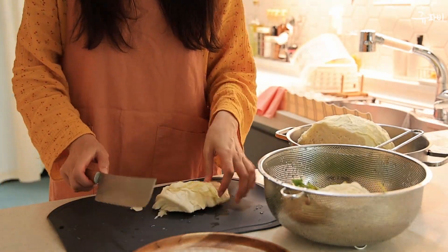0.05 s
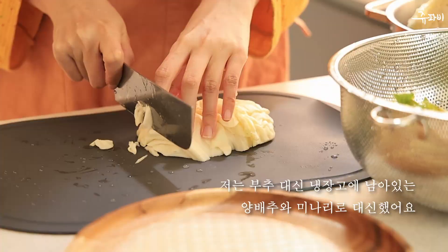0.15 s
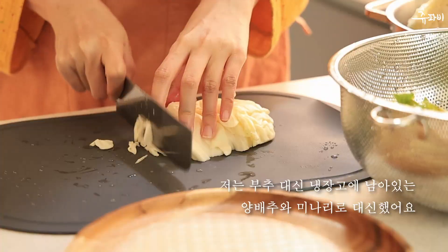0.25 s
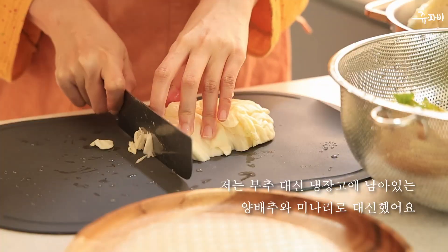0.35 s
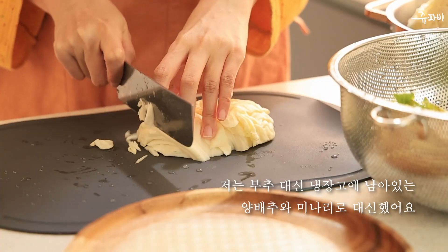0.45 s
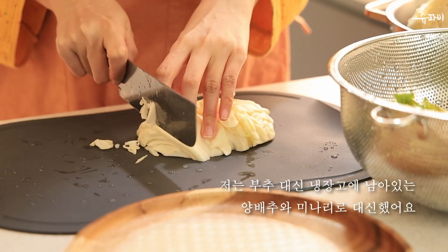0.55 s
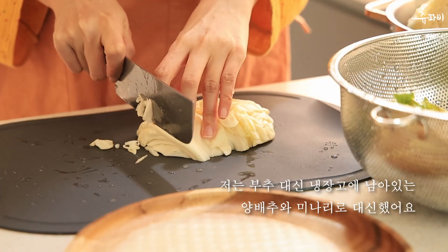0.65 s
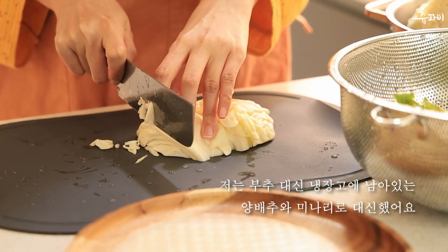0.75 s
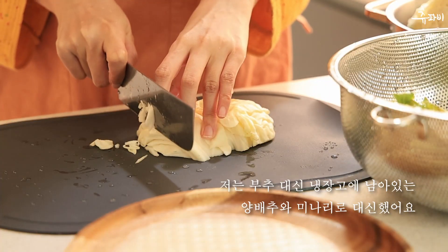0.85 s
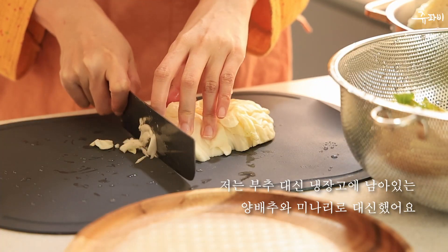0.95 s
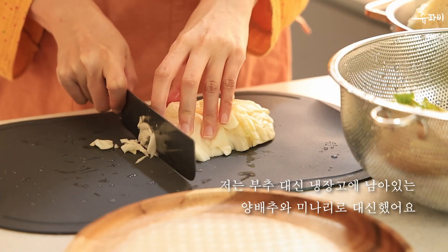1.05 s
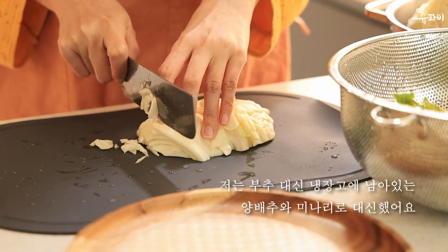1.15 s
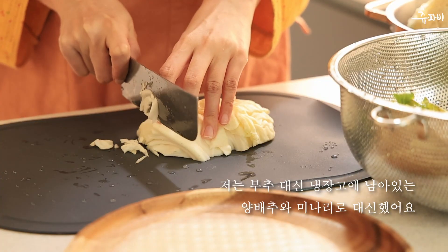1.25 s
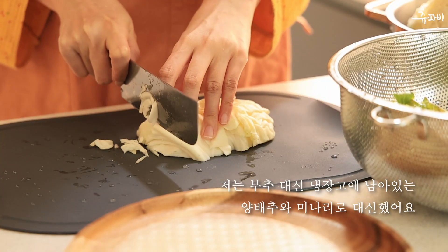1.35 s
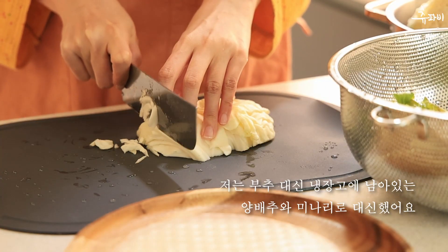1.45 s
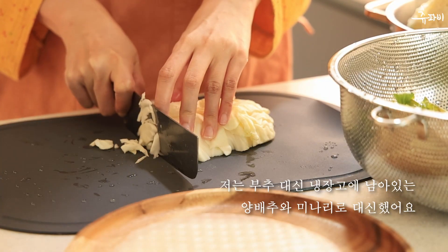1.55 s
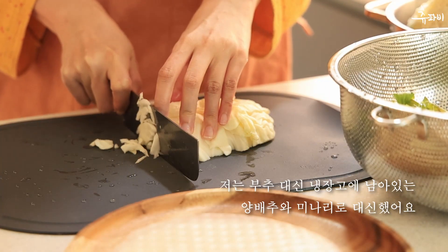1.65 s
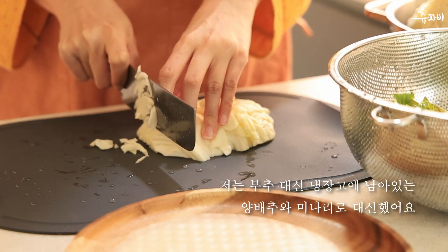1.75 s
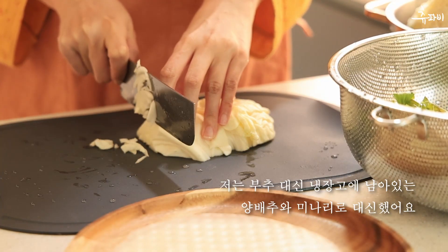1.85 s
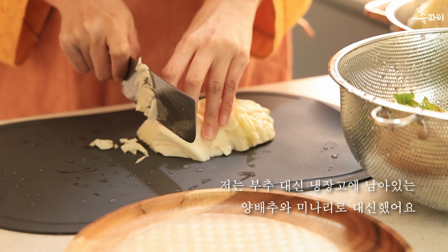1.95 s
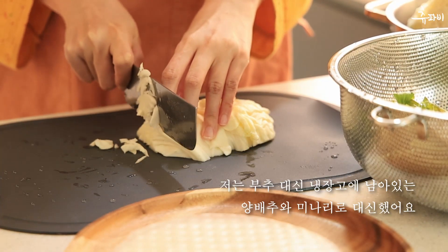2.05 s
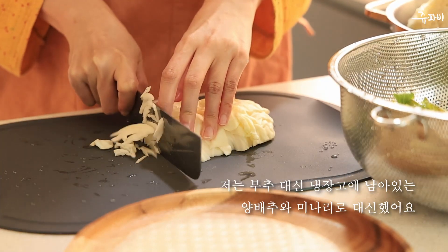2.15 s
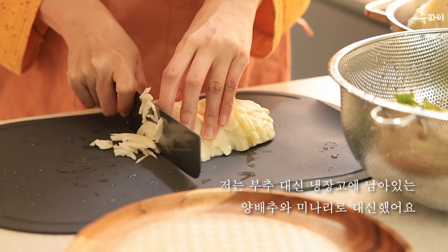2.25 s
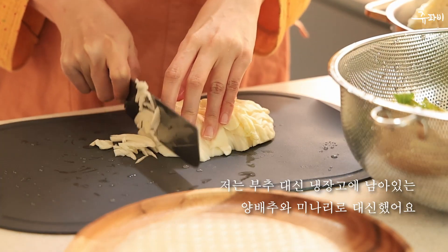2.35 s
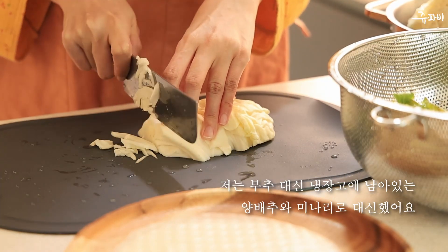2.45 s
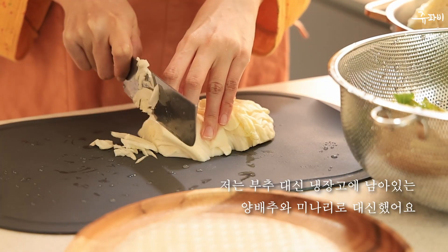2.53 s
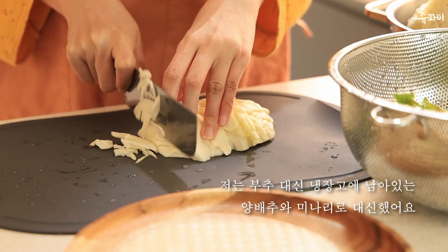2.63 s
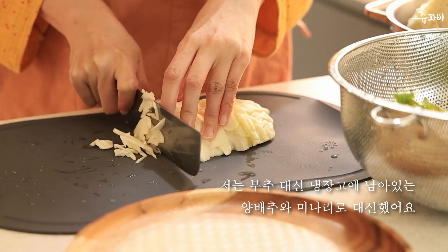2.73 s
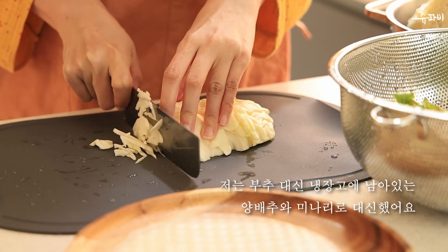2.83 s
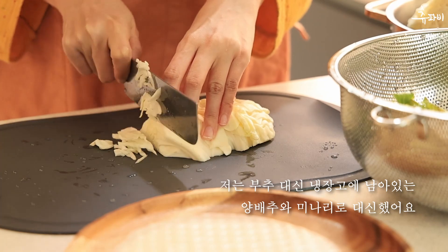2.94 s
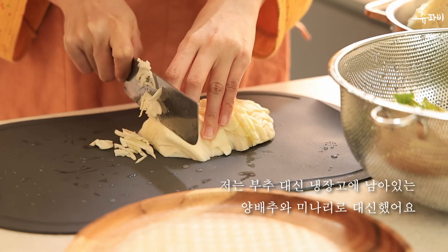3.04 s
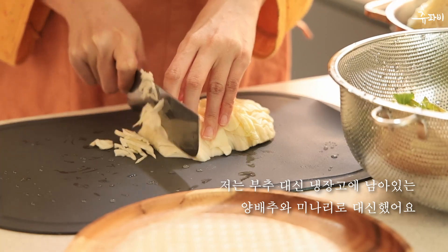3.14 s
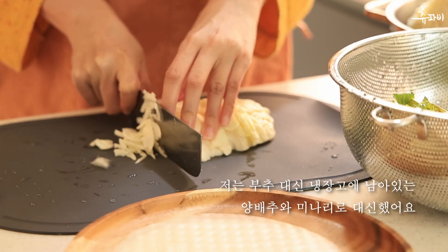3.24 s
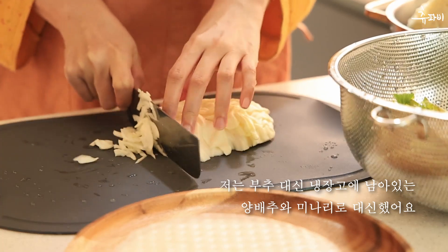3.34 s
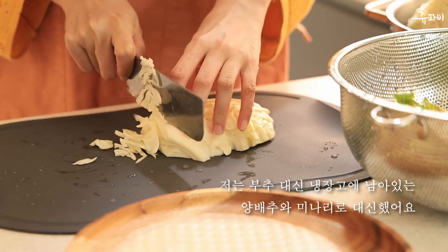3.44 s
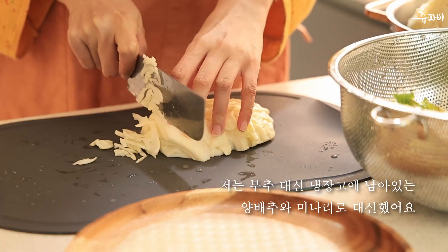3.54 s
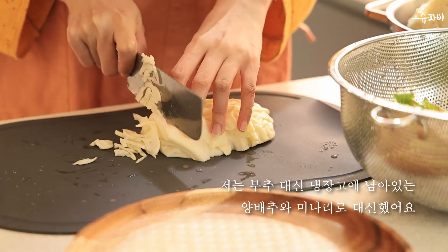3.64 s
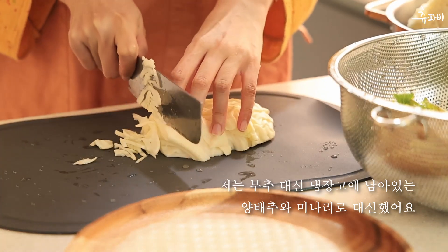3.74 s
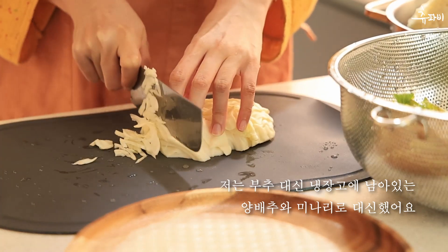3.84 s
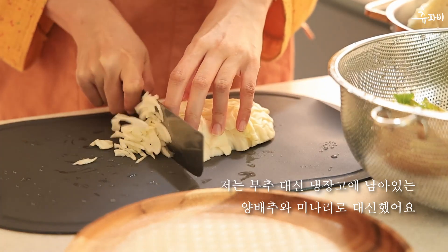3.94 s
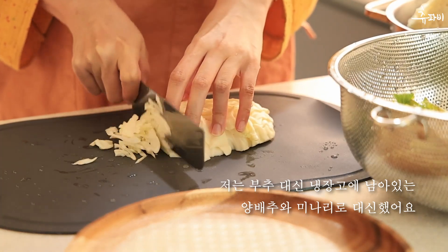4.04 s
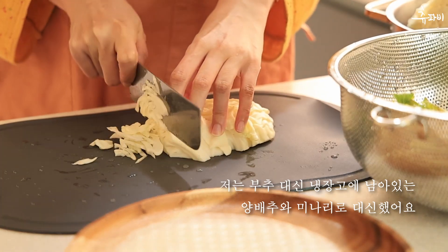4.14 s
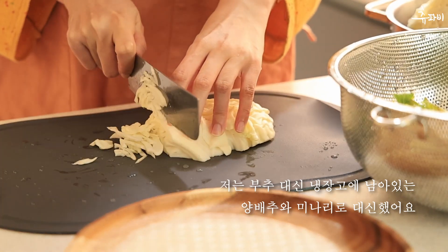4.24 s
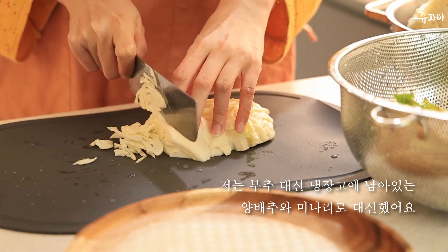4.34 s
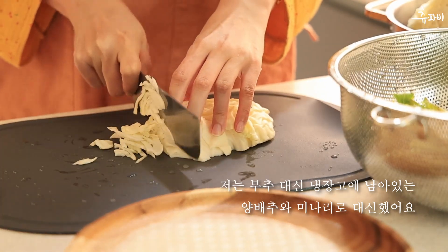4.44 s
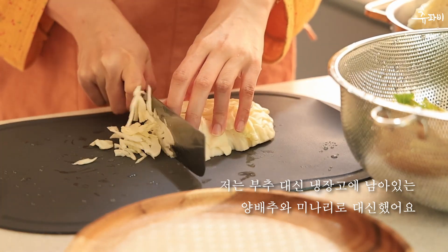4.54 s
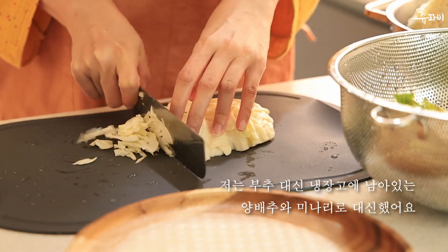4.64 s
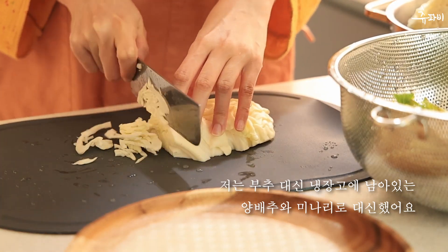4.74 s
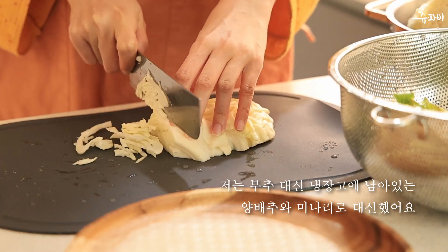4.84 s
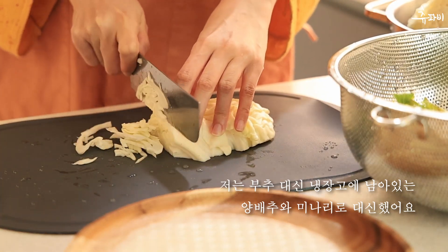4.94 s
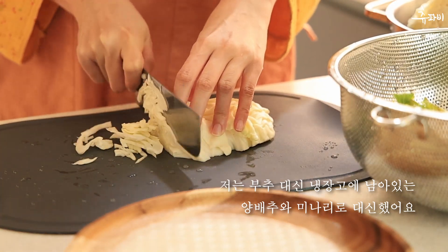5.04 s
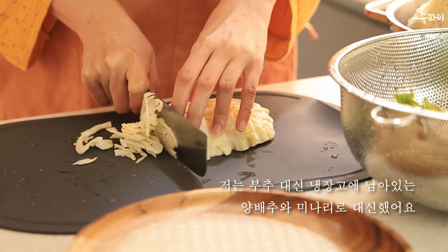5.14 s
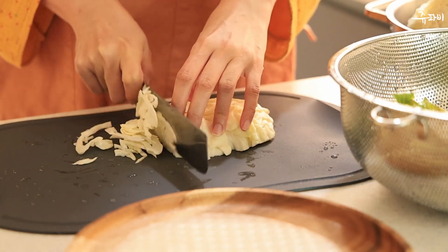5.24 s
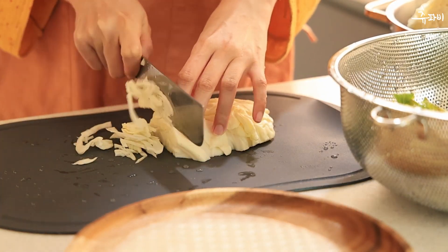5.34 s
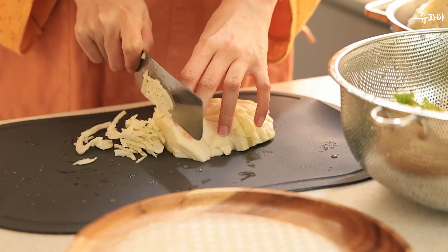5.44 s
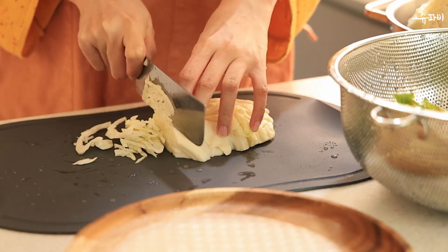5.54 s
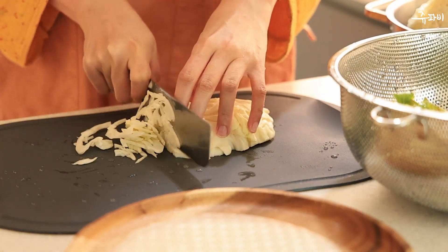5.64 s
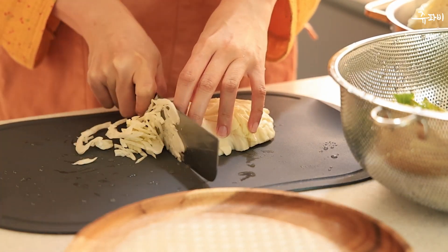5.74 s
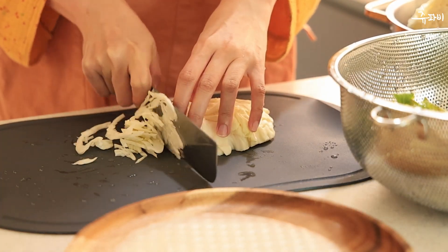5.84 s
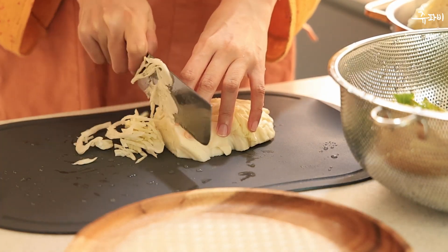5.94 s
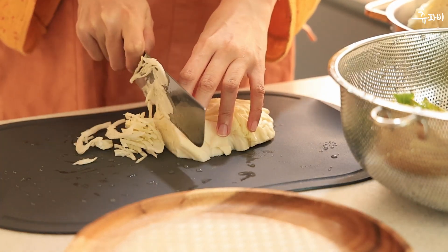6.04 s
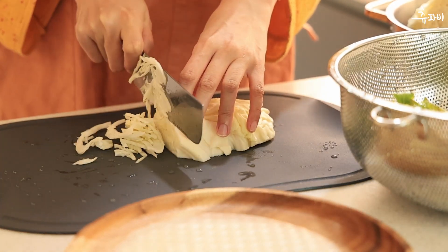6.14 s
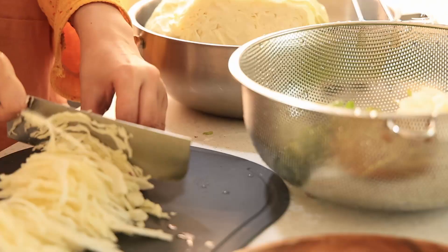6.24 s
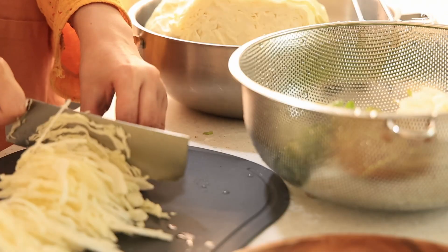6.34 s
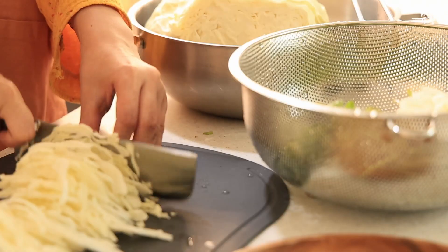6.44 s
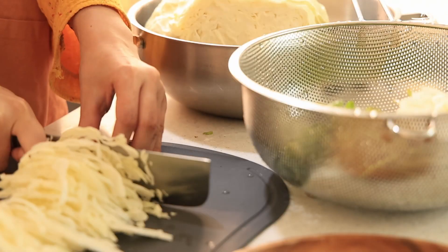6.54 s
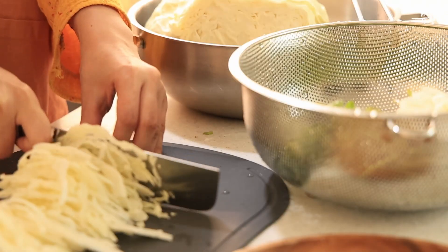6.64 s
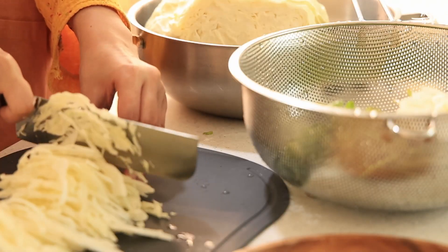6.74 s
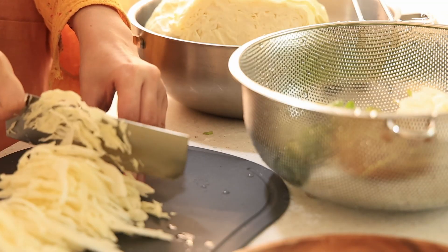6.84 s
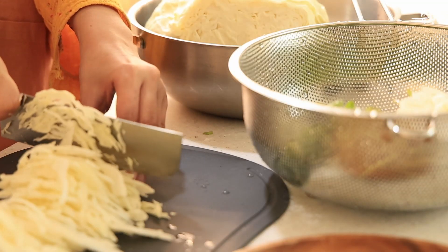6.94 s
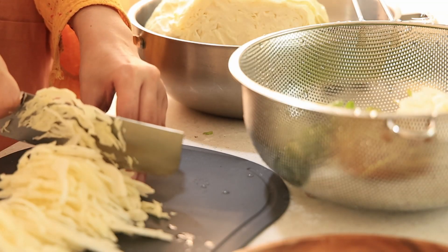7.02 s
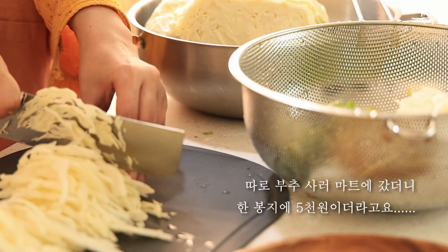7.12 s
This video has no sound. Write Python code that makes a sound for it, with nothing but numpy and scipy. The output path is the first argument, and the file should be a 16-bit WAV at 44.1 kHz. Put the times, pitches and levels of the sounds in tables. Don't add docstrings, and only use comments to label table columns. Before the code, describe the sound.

After a faint leafy rustle and light tap, a heavy knife shreds cabbage close to the microphone. Roughly every 0.6 seconds a wet, fibrous crunch climbs and stops in a loud, hollow knock on a plastic board. Loose shreds tick softly between strokes. The small kitchen gives a short echo over fridge rumble and light air hiss.

```python
import sys
import numpy as np
from scipy import signal
from scipy.fft import rfft, irfft
from scipy.io import wavfile
from scipy.ndimage import uniform_filter1d

SR = 44100
rng = np.random.default_rng(int(sys.argv[2]) if len(sys.argv) > 2 else 0)


def waveform_to_disk(signal):
    frames = np.transpose(np.atleast_2d(signal))
    scaled = np.clip(frames, -1, 1) * 32767
    samples = np.round(scaled).astype(np.int16)
    wavfile.write(sys.argv[1], SR, samples)


def natural_amplitude(level_db):
    exponent = np.asarray(level_db, float) / 20
    return 10 ** exponent


N = 316638


def rms_one(x):
    return x / np.sqrt(np.mean(x ** 2) + 1e-20)


def band(x, low_hz, high_hz):
    return signal.sosfilt(signal.butter(2, [low_hz, high_hz], "band", fs=SR, output="sos"), x)


def ring(clicks, hz, t60):
    radius, angle = natural_amplitude(-60 / (t60 * SR)), 2 * np.pi * hz / SR
    return signal.lfilter([0, np.sin(angle)], [1, -2 * radius * np.cos(angle), radius ** 2], clicks + 1e-18)


def resonate(x, peaks):
    out = 0
    for k, (hz, width_hz, db) in enumerate(peaks):
        radius = np.exp(-np.pi * width_hz / SR)
        poles = [1, -2 * radius * np.cos(2 * np.pi * hz / SR), radius ** 2]
        out = out + (-1) ** k * natural_amplitude(db) * rms_one(signal.lfilter([1, 0, -1], poles, x))
    return rms_one(out)


def grains(per_s, spread_db, clump_db):
    clumps = rms_one(uniform_filter1d(rng.standard_normal(N), size=150))
    size_db = spread_db * np.minimum(rng.exponential(1, N), 4) + clump_db * clumps
    sizes = natural_amplitude(size_db) * rng.choice([-1, 1], N)
    return sizes * (rng.random(N) < per_s / SR)


def burst(start_s, rise_s, decay_s):
    since = np.maximum(np.arange(N) / SR - start_s, 0)
    return np.minimum(since / rise_s, 1) * np.exp(-since / decay_s)


# start_s, thud_db, flat-landing clack_db and tip click_db (both over
# the thud), lowest_mode_db (more near the middle of the board)
KNOCKS = [(0.1639, -30.5, 0, 9, 17.5), (.333, -5, -11.5, -9.5, -2), (1.0006, -9, -17.5, -8, 4.5),
          (1.5878, -9, -24, -22, -26), (1.5952, -14, -26, -28, 7), (2.1878, -13, -27, -22, -0.5),
          (2.7285, -14.5, -9, -20, -2), (3.2392, -15, -15.5, -19, 7.5), (3.9542, -4.5, 0.5, -1.5, 0),
          (3.9582, -9.5, -3, -30, 7.5), (4.5307, -12, -39, -36, -4), (4.5339, -5, -31, -28, -9),
          (5.1365, -7, -10.5, -6, 5), (5.1425, -17.5, -18, -34, 7), (5.7281, -5.5, -3, -3, -1),
          (6.208, -32, -20, -30, 4), (6.5285, -21, -28, -32, 0)]
# pitch_hz, level_db, t60_s
BOARD_MODES = [
    [(324.4, -7, 0.055), (445.3, 1, 0.035), (522, -28, 0.038)],
    [(665, -2, 0.018), (851, 0, .02)],
    [(1067, 7, 0.012), (1348, 3, 0.017), (1573, -0.5, 0.011)],
    [(3000, 0, .006), (3500, -3, .006)],
    [(6300, 0, .003), (9200, -1, .003)],
]
TRAVEL_S = [.0009, .00055, .0005, .00015, 0]


def knocks():
    start_s, thud, flat, tip, lowest = np.transpose(KNOCKS)
    middle = thud + 5 + 0.42 * flat
    tick = -59 + 0.33 * (thud + tip)
    out = np.zeros(N)
    for g, (group_db, modes) in enumerate(zip([thud, middle, thud + flat, thud + tip, tick], BOARD_MODES)):
        at = np.round((start_s + TRAVEL_S[g]) * SR).astype(int)
        sign = 1 if g else -1
        for k, (hz, db, t60) in enumerate(modes):
            extra_db = lowest if g == 0 and k == 0 else 0
            clicks = np.zeros(N)
            clicks[at] = natural_amplitude(group_db + extra_db + db + 1.5 * rng.standard_normal(len(start_s)))
            out += sign * ring(clicks, hz, t60)
    return band(out, 150, 18000)


def layers_db(top_db, below_db, eased_db, dry_db, weight_db):
    crack = below_db + eased_db
    sizzle = -6.5 + 1.04 * dry_db
    push = weight_db + 0.87 * below_db + 1.8 * eased_db
    shudder = -7 + 0.8 * below_db
    return top_db + np.array([crack, sizzle, push, shudder])


# start_s, entry_db, loudest_db, share of the stroke before
# the loudest, weight_db (push on the board over the crack)
STROKES = [(.28, -49.5, -53, .8, 3.5), (0.89, -50.5, -32.5, 1, -2), (1.507, -48, -34, 0.6, -4.5),
           (2.071, -52, -30.5, 0.88, -2), (2.656, -60, -32, 0.8, 8.5), (3.157, -47, -27.5, 0.54, 5),
           (3.847, -50, -24.5, 1, 4.5), (4.421, -46.5, -29, 1, 6), (5.038, -45, -31, 0.57, 1),
           (5.58, -47, -32, 0.85, 3), (6.4465, -41.5, -28.5, 0.39, -2)]
STOP_S = [0.0089, 0.0075, 0.009, 0.0055]
LAST_LEAF_S, EASE_DB = 0.0059, 2.5


def stroke_gains():
    t, gains, knock_s = np.arange(N) / SR, np.zeros((4, N)), np.array(KNOCKS)[:, 0]
    for start, entry_db, top_db, share, weight_db in STROKES:
        end = knock_s[knock_s > start][0] - LAST_LEAF_S
        share = np.minimum(share, .98)
        near = slice(round(start * SR), round((end + .15) * SR))
        depth = np.clip((t[near] - start) / (end - start), 0, 1)
        below_db = (entry_db - top_db) * (1 - np.minimum(depth / share, 1))
        dry_db = (entry_db - top_db) * (1 - np.minimum(2 * depth / (1 + share), 1))
        eased_db = -EASE_DB * np.maximum(depth - share, 0) / (1 - share)
        stop_s = np.array(STOP_S)[:, None] * natural_amplitude(-weight_db)
        fall = np.exp(-np.maximum(t[near] - end - .006, 0) / stop_s)
        rise = np.clip((t[near] - start) / .002, 0, 1)
        gains[:, near] += rise * fall * natural_amplitude(layers_db(top_db, below_db, eased_db, dry_db, weight_db))
    return gains


# start_s, length_s, crack_db, weight_db (over the crack)
NUDGES = [
    (.01, 0.25, -46.5, -3),
    (0.656, 0.066, -56.5, -1),
    (1.736, 0.19, -63, 18),
    (2.913, 0.15, -58, 9.5),
    (6.073, 0.061, -57, -6),
    (6.198, 0.053, -51, 0),
]


def nudge_gains():
    t, gains = np.arange(N) / SR, np.zeros((4, N))
    for start, length, db, weight_db in NUDGES:
        near = slice(round(start * SR), round((start + length) * SR))
        swell = np.sin(np.pi * np.sqrt(np.clip((t[near] - start) / length, 0, 1)))
        below_db = 20 * (swell - 1)
        gains[:, near] += np.minimum(5 * swell, 1) * natural_amplitude(layers_db(db, below_db, 0, below_db, weight_db))
    return gains


# start_s, level_db, decay_s
JOLTS = [(2.688, -20, 0.05), (3.177, -36, 0.024), (3.848, -25.5, 0.0095), (3.927, -39, 0.0086),
         (4.448, -19.5, 0.0066), (4.475, -48, 0.0056), (5.048, -30.5, 0.023), (5.58, -24, 0.01),
         (6.478, -23, 0.0086), (6.537, -42, 0.012), (1.514, -42, 0.033), (2.111, -33, 0.021),
         (6.205, -38.5, 0.015)]


def jolts():
    return sum(natural_amplitude(db) * burst(start, 0.0064, decay_s) for start, db, decay_s in JOLTS)


def landings():
    return sum(natural_amplitude(0.46 * row[1] - 28) * burst(row[0], 0.00033, 0.0077) for row in KNOCKS)


# pitch_hz, width_hz, level_db
RIB_PEAKS = [(1260, 1200, 3.5), (1950, 990, 5), (2400, 540, 2), (3390, 1160, 4), (3934, 1320, 2)]
# pitch_hz, width_hz, level_db
CELL_PEAKS = [(5750, 650, 0.5), (8500, 2400, 11), (9920, 3500, 12.5), (11230, 2200, 8), (14300, 2600, -6)]
# pitch_hz, width_hz, level_db
LOADED_BOARD = [(315, 89, 8.5), (494.4, 44, 6.5), (660, 200, 2.5), (785, 1050, 4)]
# pitch_hz, width_hz, level_db
COUNTER = [(100.6, 22, 6.5), (207, 90, 8.5)]


def strokes():
    gains = stroke_gains() + nudge_gains()
    shocks = jolts()
    gains[2] += shocks
    gains[3] += natural_amplitude(-14.5) * shocks + landings()
    crack = resonate(grains(per_s=8400, spread_db=3.0, clump_db=3.0), RIB_PEAKS)
    sizzle = resonate(grains(per_s=6400, spread_db=3.5, clump_db=1.0), CELL_PEAKS)
    force = grains(per_s=2500, spread_db=1.5, clump_db=-2.0)
    push, shudder = resonate(force, LOADED_BOARD), resonate(force, COUNTER)
    return np.sum(gains * [crack, sizzle, push, shudder], axis=0)


# start_s, ring_db, pitch_hz, tick_db
RIBS = [(.0708, -29, 2580, -46), (.2844, -26.5, 2150, -42), (0.9612, -16.5, 1950, -36),
        (0.9918, -13.5, 2830, -24), (1.511, -36, 1400, -37), (1.554, -16.5, 2010, -29),
        (1.581, -36, 2990, -21), (2.1757, -26, 2800, -16.5), (2.6674, -31.5, 2000, -35),
        (2.7155, -25, 1480, -14.5), (3.8502, -32, 1080, -41), (4.4254, -46, 2900, -39),
        (4.5298, -22, 4020, -14), (5.047, -49, 2700, -34), (5.5811, -33, 3900, -28.5),
        (6.449, -24, 1320, -51), (6.4614, -24, 4770, -51), (6.4738, -34, 2700, -36)]
# start_s, ring_db, pitch_hz, tick_db
SHREDS = [(0.092, -33, 3400, -50), (1.194, -36, 2100, -33), (1.741, -37.5, 3550, -41),
          (1.7594, -39, 3470, -39.5), (2.4707, -38.5, 2220, -32.5), (2.856, -50, 3170, -49),
          (2.93, -41.5, 3130, -42), (2.9476, -43, 2640, -41), (2.973, -42, 2800, -61),
          (2.9965, -36.5, 1730, -39.5), (3.0597, -40, 3290, -51), (3.1114, -42, 2300, -55),
          (3.3589, -40, 2670, -65), (3.406, -40.5, 3180, -54), (3.4751, -39, 2810, -40),
          (3.5938, -39, 5300, -38.5), (4.123, -39.5, 3000, -41), (4.2932, -39.5, 6560, -39),
          (4.389, -39, 2800, -46), (4.649, -41, 3100, -41), (4.7018, -41, 2780, -53),
          (4.722, -41, 2480, -44), (4.8636, -42, 4000, -42.5), (5.3149, -46, 2330, -53),
          (5.4177, -36.5, 3130, -38), (6.0752, -46, 2500, -44), (6.4227, -38.5, 3230, -42),
          (6.808, -42.5, 4460, -53)]
RIB_CYCLES, SHRED_S = 10.2, 0.0059


def snaps():
    out, t = np.zeros(N), np.arange(2200) / SR
    rows = [(*row, RIB_CYCLES / row[2]) for row in RIBS] + [(*row, SHRED_S) for row in SHREDS]
    for start, ring_db, hz, tick_db, decay_s in rows:
        snap = rng.standard_normal(len(t)) * np.exp(-t / decay_s) + 6 * (t == 0)
        body = band(snap, hz / 1.35, hz * 1.35)
        tick = band(snap, 6000, 12000)
        snap = natural_amplitude(ring_db) * body / np.abs(body).max() + natural_amplitude(tick_db) * tick / np.abs(tick).max()
        at = round(start * SR)
        out[at:at + len(t)] += snap[:N - at]
    return out


# pitch_hz, width_hz, level_db
BLADE = [(2300, 700, 0.5), (3750, 580, -3), (5300, 350, -5), (7950, 380, -4.5), (10500, 1300, -3),
         (13500, 2500, -15)]
SLIDE_S, SLIDE_RISE_S, SLIDE_LENGTH_S = .5, .014, .055


def slide():
    since = np.arange(N) / SR - SLIDE_S
    edge = np.clip(np.minimum(since / SLIDE_RISE_S, (SLIDE_LENGTH_S - since) / 0.0044), 0, 1)
    fade = natural_amplitude(-43 - 300 * np.maximum(since - SLIDE_RISE_S, 0))
    return edge * fade * resonate(grains(per_s=7700, spread_db=2.0, clump_db=4.0), BLADE)


# pitch_hz, level_db, t60_s
KITCHEN = [(174, -17, 0.35), (307, -12, 0.27), (461, -10.5, 0.31), (603, -7, 0.22), (980, -13, 0.35),
           (1640, -8, 0.16), (2600, -18.5, 0.37), (4170, -5, 0.13), (6020, -11, 0.32), (10500, -34, 0.16)]


def kitchen(x):
    t, tail = np.arange(SR // 2) / SR, 0
    white = rng.standard_normal((2, len(t)))
    for k, (hz, db, t60) in enumerate(KITCHEN):
        echoes = band(white[k % 2], hz / 1.3, hz * 1.3)
        even = np.sqrt(uniform_filter1d(echoes ** 2, size=int(3 * SR / hz)) + 1e-9)
        decay_db = -60 * (t / t60) ** 1.174
        tail = tail + natural_amplitude(db + decay_db) * echoes / even
    build_up = 1 - np.exp(-np.maximum(t - .004, 0) / 0.0093)
    return natural_amplitude(3.5) * signal.fftconvolve(x, tail * build_up / np.sqrt(SR))[:N]


# pitch_hz, level_db (per Hz)
FLOOR = [(12, -46), (20, -6.5), (58, 6.5), (76, -0.5), (92, -9), (148, -11.5), (225, -14), (274, -7.5),
         (306, -13.5), (465, -16), (520, -20.5), (565, -18), (857, -17.5), (3450, -33.5), (15500, -40.5)]
# start_s, rumble_db
FRIDGE = [
    (0.0, -56.5),
    (1.4, -50.5),
    (3.6, -50),
    (5.0, -45.5),
    (6.1, -48.5),
    (7.18, -59),
]


def floor():
    hz = np.maximum(np.fft.rfftfreq(N, 1 / SR), 1)
    point_hz, point_db = np.transpose(FLOOR)
    start_s, rumble_db = np.transpose(FRIDGE)
    air = rfft(rng.standard_normal(N)) * natural_amplitude(np.interp(np.log(hz), np.log(point_hz), point_db))
    low = 1 / (1 + (hz / 100) ** 6)
    hiss = natural_amplitude(-48.5) * rms_one(irfft(air * (1 - low), N))
    load = natural_amplitude(np.interp(np.arange(N) / SR, start_s, rumble_db))
    return hiss + load * rms_one(irfft(air * low, N))


SCENE_CHANGE_S = .1675


def scene():
    t = np.arange(N) / SR
    blows, leaves = knocks(), strokes() + snaps() + slide()
    before, after = t < SCENE_CHANGE_S, t > KNOCKS[1][0] - .01
    echo = kitchen(blows * after + natural_amplitude(4.5) * leaves * ~before)
    return (blows * (before | after) + leaves + echo + floor())[None]


def top_cut(x):
    return signal.sosfilt(signal.butter(12, 15660, fs=SR, output="sos"), x)


LIMIT_DB, RELEASE_DB_S, ATTACK_S = -4, 146, .004


def record(dry):
    t = np.arange(N) / SR
    over_db = np.maximum(20 * np.log10(np.abs(dry[0]) + 1e-9) - LIMIT_DB, 0)
    held_db = np.maximum(np.maximum.accumulate(over_db + RELEASE_DB_S * t) - RELEASE_DB_S * t, 0)
    lag = np.exp(-1 / (ATTACK_S * SR))
    duck_db = 0.58 * signal.lfilter([1 - lag], [1, -lag], held_db)
    mix = np.clip(dry * natural_amplitude(-duck_db), -1, 1)
    return top_cut(mix)


dry = scene()
out = record(dry)
waveform_to_disk(out)
```